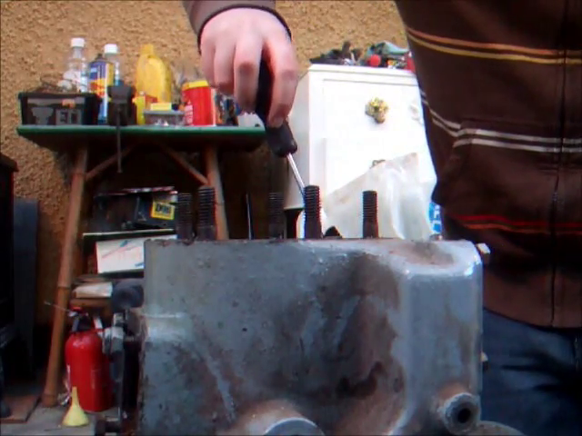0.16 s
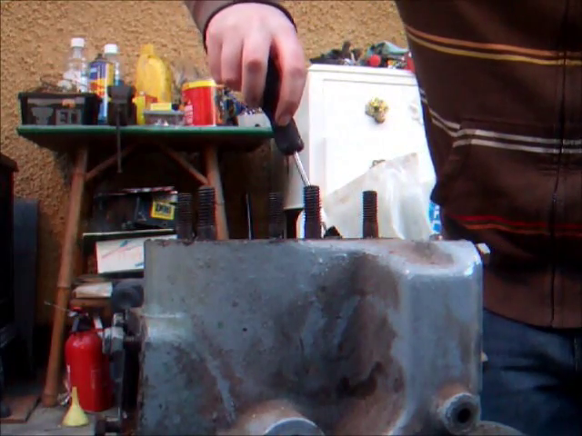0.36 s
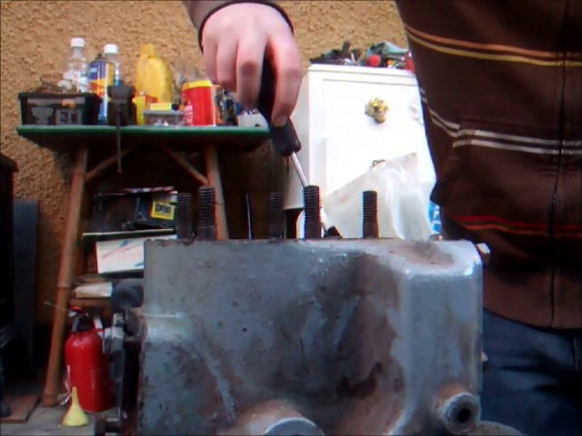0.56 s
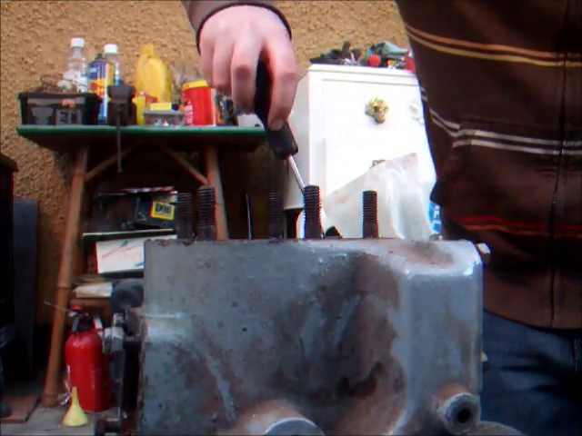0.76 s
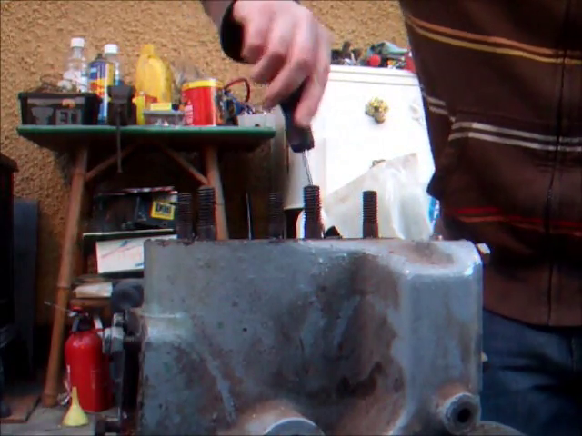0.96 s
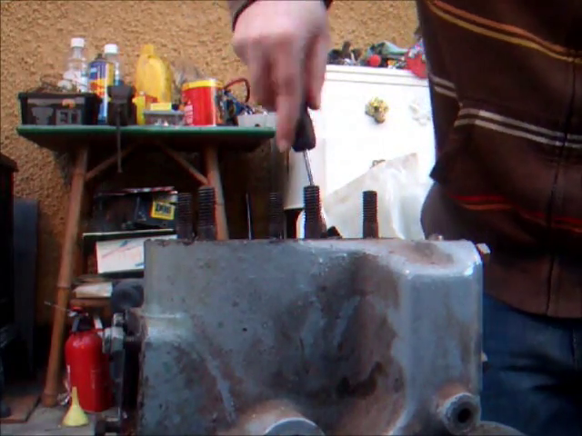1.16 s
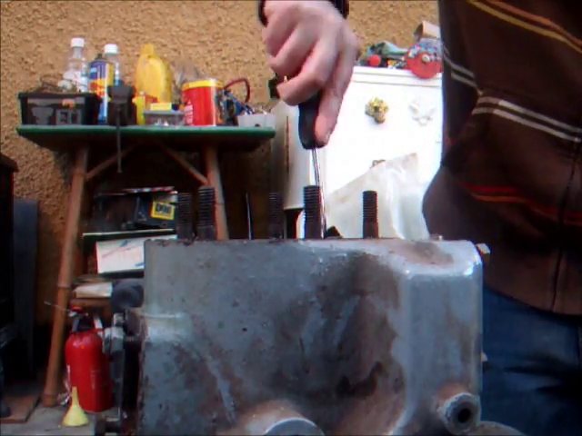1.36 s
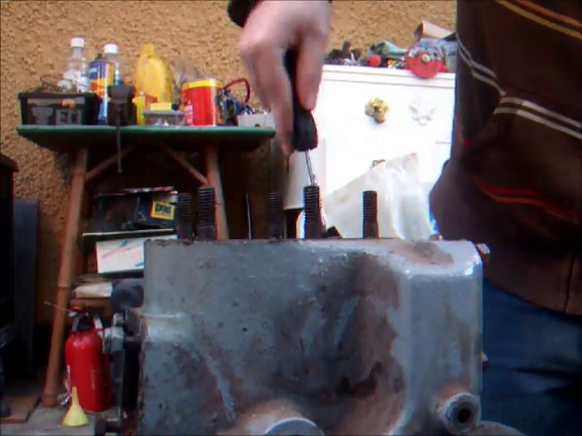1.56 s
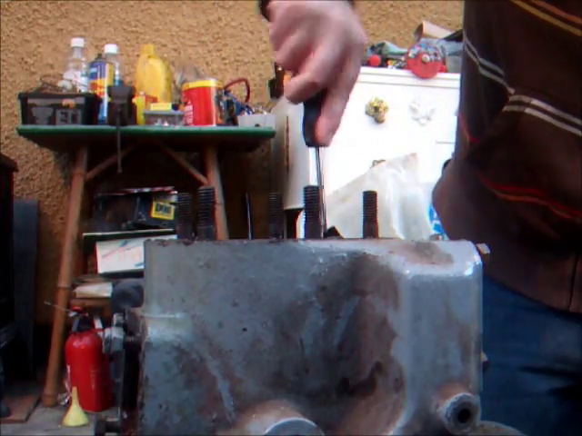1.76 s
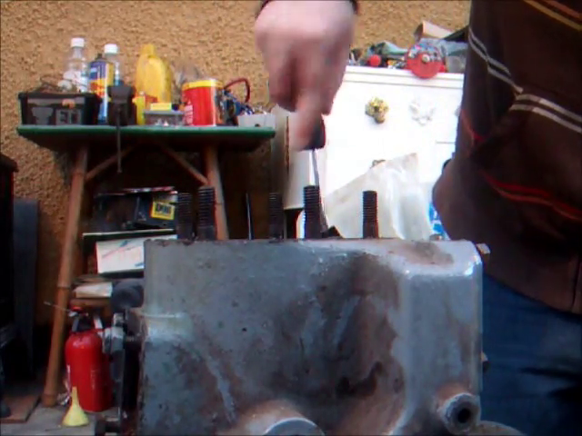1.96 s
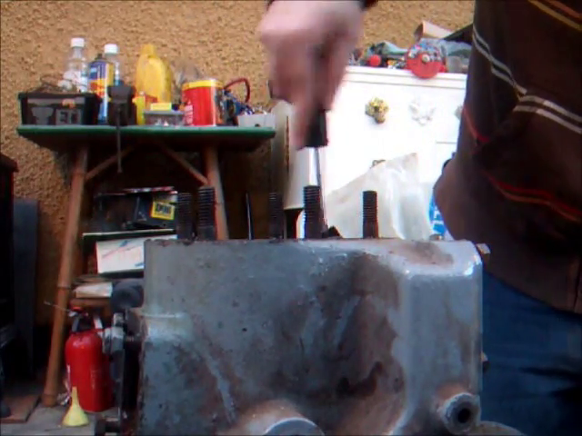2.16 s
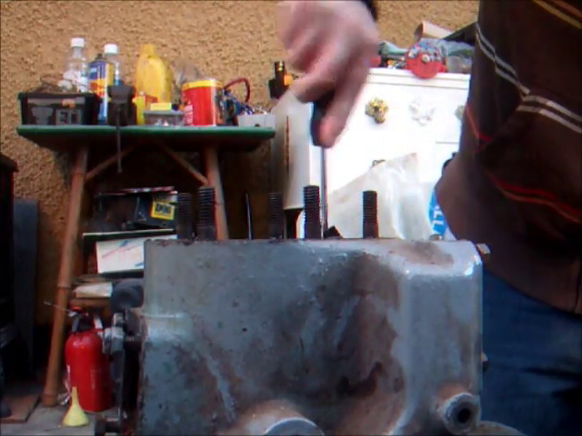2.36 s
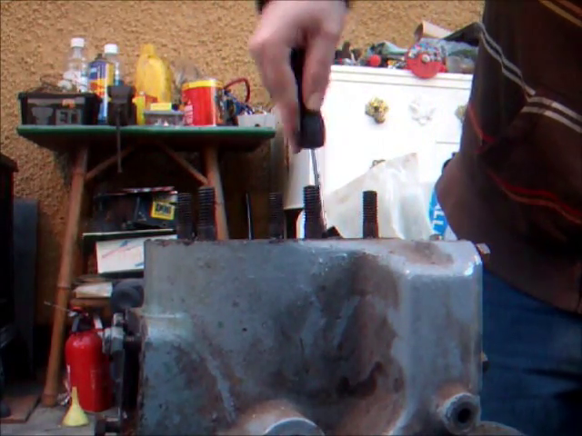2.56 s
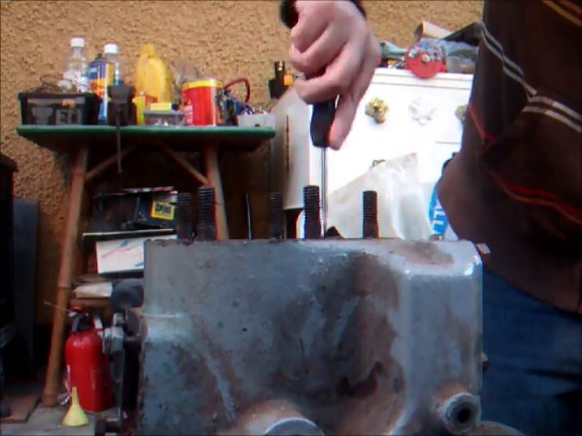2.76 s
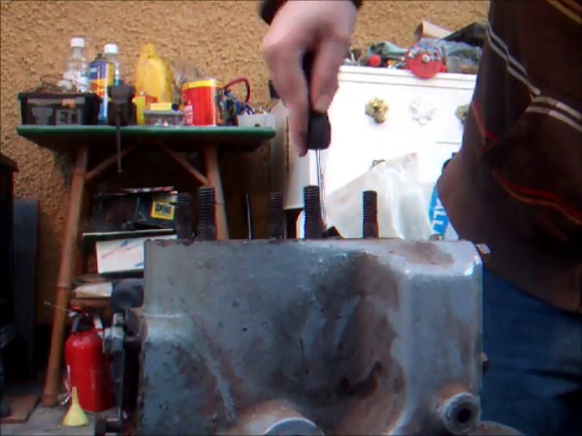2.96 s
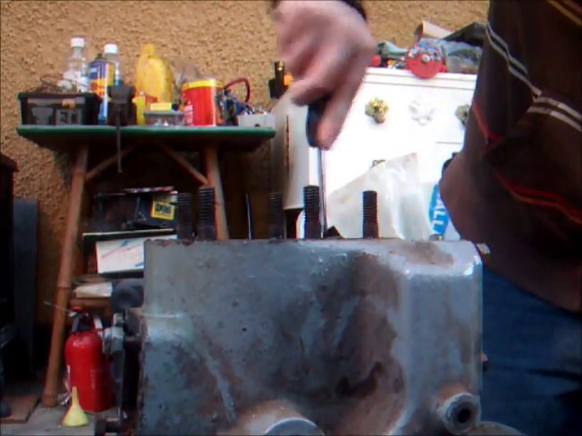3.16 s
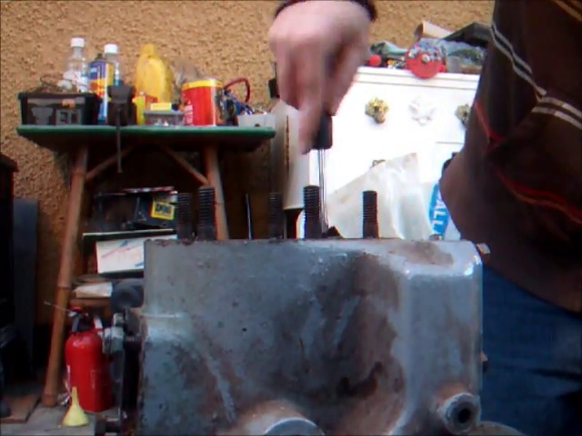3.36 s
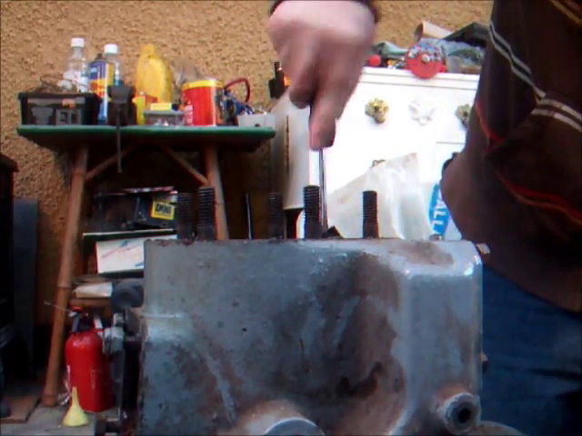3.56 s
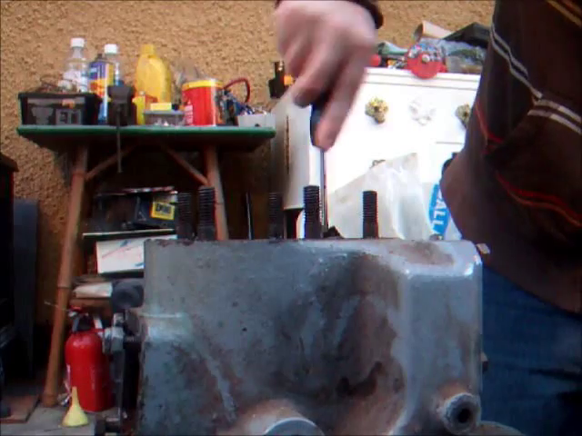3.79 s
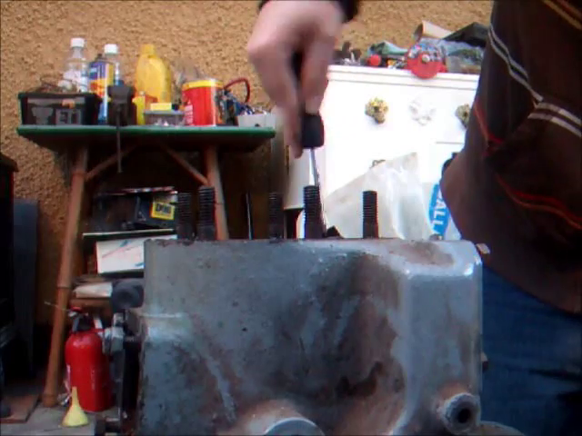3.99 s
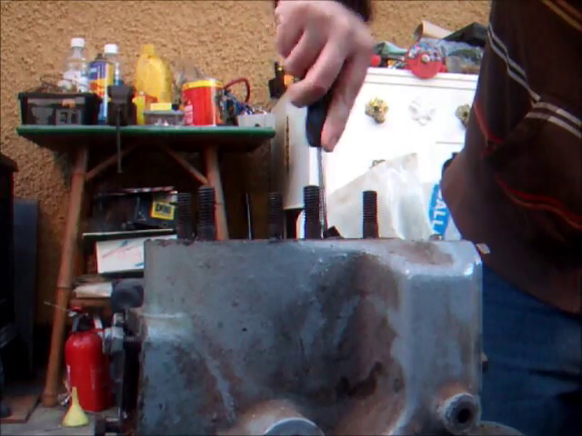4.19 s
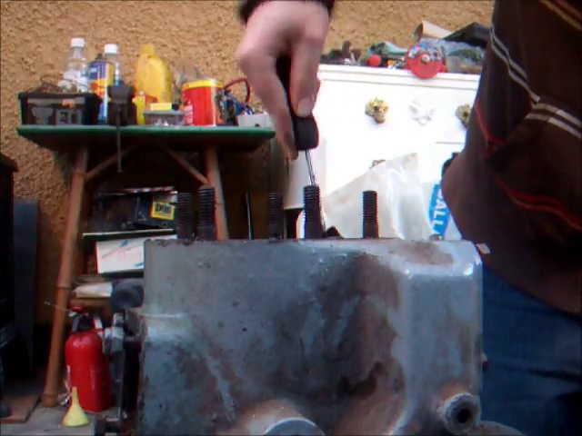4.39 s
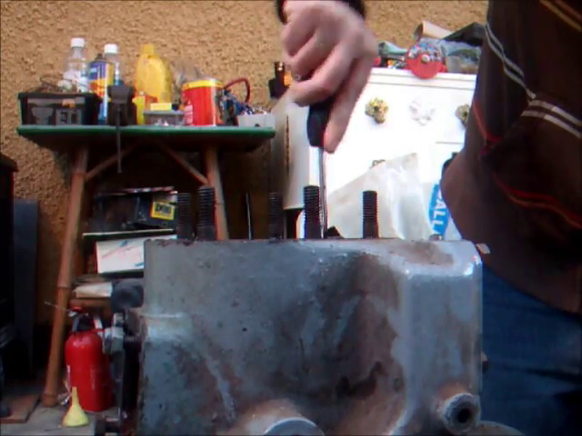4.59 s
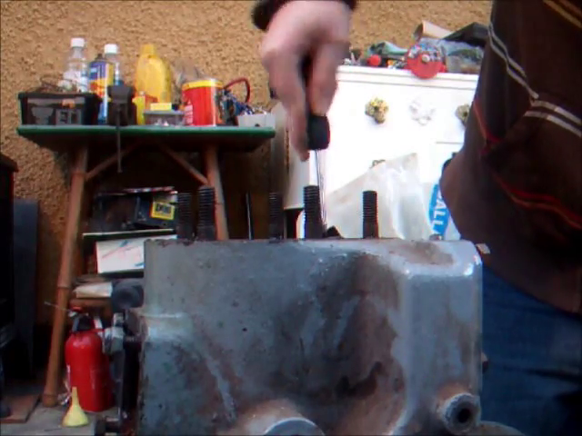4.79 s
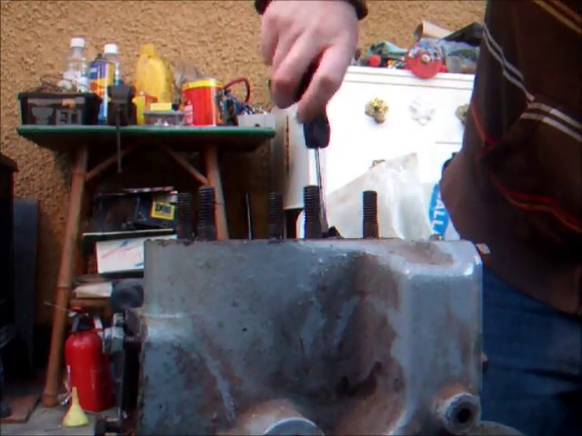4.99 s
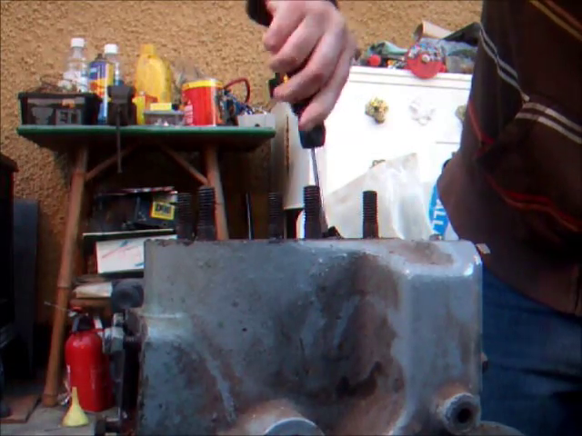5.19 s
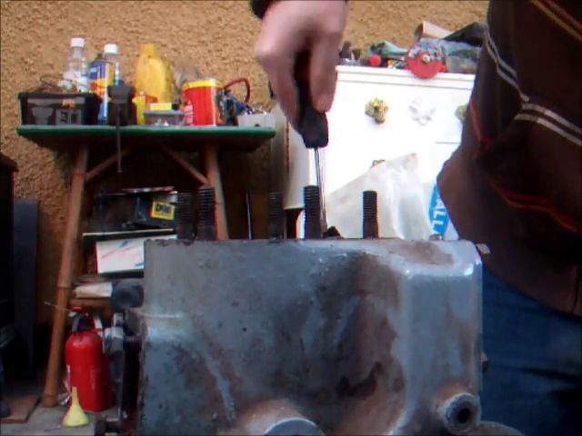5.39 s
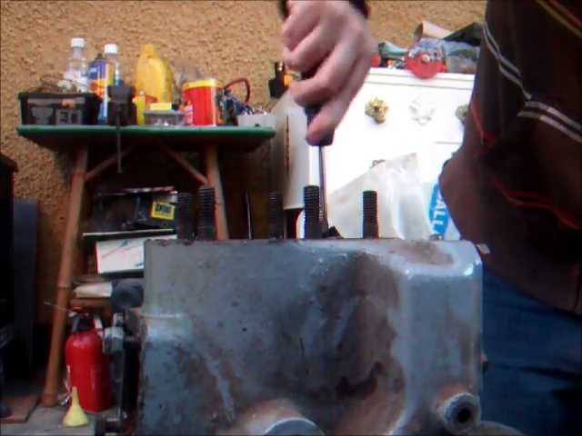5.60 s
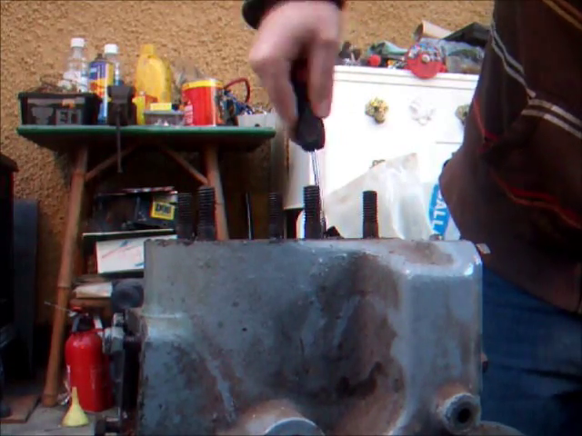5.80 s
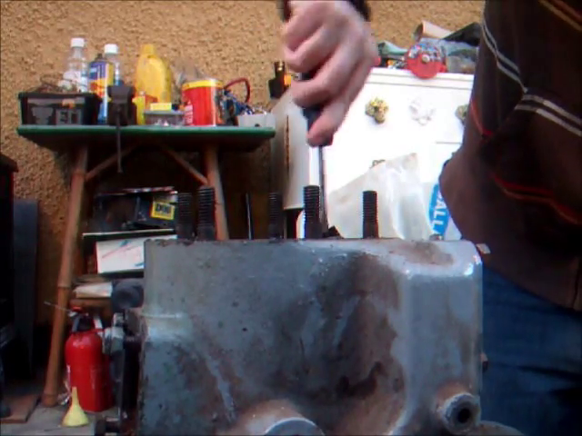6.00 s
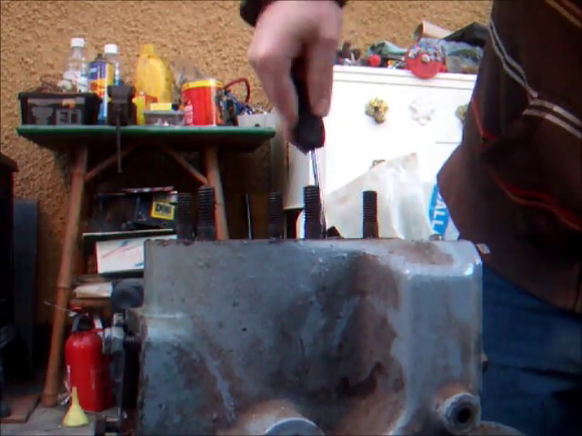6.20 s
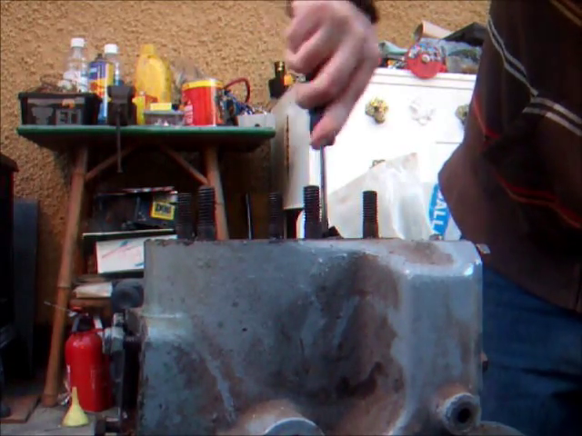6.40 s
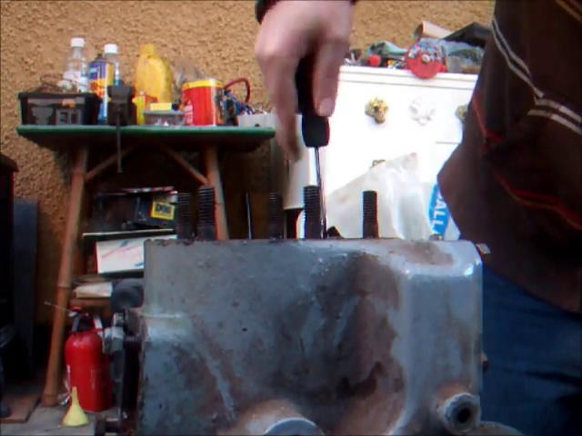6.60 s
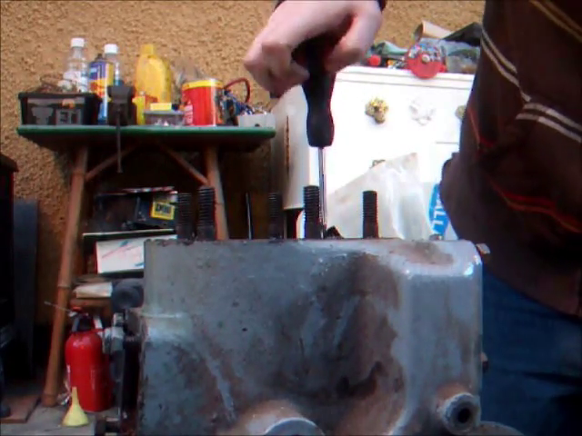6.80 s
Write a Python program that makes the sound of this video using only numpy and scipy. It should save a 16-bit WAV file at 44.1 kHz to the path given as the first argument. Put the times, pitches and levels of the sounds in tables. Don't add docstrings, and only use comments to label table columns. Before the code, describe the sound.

A screwdriver twists a steel valve to and fro on gritty paste, short rasping strokes with small ticks, over distant swelling traffic.

```python
import sys
import numpy as np
from scipy import signal
from scipy.fft import rfft, irfft, next_fast_len
from scipy.io import wavfile
from scipy.ndimage import uniform_filter1d, map_coordinates

SR = 44100
rng = np.random.default_rng(int(sys.argv[2]) if len(sys.argv) > 2 else 0)


def master(y):
    cut = np.clip(np.atleast_2d(y).T, -1, 1)
    pcm = np.round(cut * 32767)
    wavfile.write(sys.argv[1], SR, pcm.astype(np.int16))


def elevation(decibels):
    levels = np.asarray(decibels, float)
    return 10 ** (levels / 20)


N = 302085

# f/Hz, width/Hz, level/dB
CASTING_MODES = [(880, 140, -8.5), (1348, 240, -1), (1680, 52, 0), (2008, 330, -3.5), (2270, 260, -3.5),
                 (2595, 220, 1), (2040, 2300, -8)]
# f/Hz, width/Hz, level/dB
VALVE_MODES = [(2968, 240, 4.5), (3140, 190, 3.5), (3370, 190, 5.5), (3610, 250, 4.5), (3747, 96, 6),
               (3936, 260, 0.5), (4125, 170, 1), (3470, 2060, -1)]


def unit(x):
    return x / np.sqrt(np.mean(x ** 2) + 1e-20)


def along(points, hz):
    f, value = np.transpose(points)
    return np.interp(np.log(hz + 1), np.log(f + 1), value)


def wobble(rate):
    knots = rng.standard_normal(int(N * rate / SR) + 4)
    return map_coordinates(knots, [np.arange(N) * rate / SR])


def filtered(x, response):
    size = 2 * next_fast_len(len(x) // 2 + 4096)
    hz = np.fft.rfftfreq(size, 1 / SR)
    return irfft(rfft(x, size) * response(hz), size)[:len(x)]


def patchy(x, size, patchy_db, bins, frames):
    z = signal.stft(x, nperseg=size)[2]
    field = uniform_filter1d(rng.standard_normal(z.shape), size=bins, axis=0)
    field = uniform_filter1d(field, size=frames, axis=1)
    return signal.istft(z * elevation(patchy_db * unit(field)), nperseg=size)[1][:N]


def ringing(x, modes):
    size = 2 ** 14
    f, k = np.fft.rfftfreq(size, 1 / SR), np.arange(size)
    power = 0
    for centre, width, db in modes:
        damping = (f * width) ** 2
        power = power + elevation(2 * db) * (damping / ((centre ** 2 - f ** 2) ** 2 + damping)) ** 2
    cepstrum = irfft(np.log(power / power.mean() + 1e-9) / 2)
    causal = np.where(k < size // 2, 2, 0) / (1 + (k == 0))
    response = irfft(np.exp(rfft(cepstrum * causal)))
    return signal.oaconvolve(x, response[:size // 2])[:len(x)]


def rush(spectrum, patchy_db):
    noise = patchy(rng.standard_normal(N + 512), 512, patchy_db, bins=5, frames=12)
    return unit(filtered(noise, lambda hz: elevation(along(spectrum, hz))))


def engine_drone():
    # t/s, f/Hz, level/dB
    engine_path = [(0.0, 56.6, -47), (0.25, 54.5, -53), (0.78, 54.4, -54.5), (0.9, 62.4, -49),
                   (1.01, 61.3, -56), (3.38, 61.64, -49), (3.53, 55.4, -58), (3.64, 58.2, -51),
                   (3.93, 61.6, -52), (4.25, 61.1, -47.5), (5.32, 61.2, -49), (6.73, 57.54, -37.5),
                   (6.81, 55.7, -40), (6.85, 54, -40)]
    # multiple, level/dB
    orders = [(1.0, -0.5), (2.0, -11.5), (3.0, -17)]
    s, note_hz, note_db = np.transpose(engine_path)
    t = np.arange(N) / SR
    hz = np.interp(t, s, note_hz) * (1 + .007 * wobble(7))
    phase = 2 * np.pi * np.cumsum(hz) / SR
    drone = sum(elevation(db + 2.3 * wobble(3.8)) * np.sin(k * phase) for k, db in orders)
    return drone * elevation(np.interp(t, s, note_db) + 2.0)


def traffic():
    # t/s, level/dB
    nearness = [(0.0, -42), (1.64, -40), (2.12, -41.5), (3.87, -36), (4.69, -36.5), (5.36, -35),
                (5.84, -36.5), (6.28, -35), (6.85, -35)]
    # f/Hz, level/dB per Hz
    rumble_spectrum = [(12, -41), (20, 1.5), (27, -8), (60, 1.5), (147, -8.5), (179, -3.5), (238, -7.5),
                       (330, -17.5), (430, -42.5), (730, -120)]
    # f/Hz, level/dB per Hz
    tyre_spectrum = [(160, -38.5), (280, -10.5), (596, -5), (769, -3), (1270, -7), (1390, -5), (1800, -10),
                     (2270, -12.5), (3480, -17), (3910, -20.5), (4500, -23), (5850, -64.5), (9900, -120)]
    # [(f/Hz, width/Hz, level/dB)]
    hollows = [
        (1.5, [(352, 23, -12.5), (848, 93, -10.5), (997, 44, -6.5)]),
        (3.9, [(363, 34, -6), (627, 47, -1.5), (792, 35, 5.5), (997, 104, -2)]),
        (5.2, [(373, 42, -1.5), (625, 35, 2), (772, 34, -3.5), (875, 47, -2.5), (998, 75, -2)]),
        (6.5, [(367.3, 41, -1.5), (562, 86, -0.5), (800, 39, -11), (856, 39, -5), (994, 31, -8)]),
    ]
    t = np.arange(N) / SR
    near_db = np.interp(t, *np.transpose(nearness))
    rumble = elevation(near_db - 9.5) * rush(rumble_spectrum, patchy_db=1.0)
    peak_s = [when for when, modes in hollows]
    hollow = np.zeros(N)
    for one, (when, modes) in zip(np.eye(len(hollows)), hollows):
        fade = np.interp(t, peak_s, one)
        hollow += np.sqrt(fade) * ringing(rng.standard_normal(N), modes)
    roar = elevation(0.32) * rush(tyre_spectrum, patchy_db=0.73) + elevation(-6.5) * hollow
    return rumble + elevation(near_db + 1.5) * roar


def hiss():
    # f/Hz, level/dB per Hz
    hiss_spectrum = [(1500, -34), (3000, -7), (5500, -2), (8000, -8)]
    return elevation(-46.5) * rush(hiss_spectrum, patchy_db=0.5)


def tail(stretch):
    # f/Hz, t60/s
    yard_decay = [(1000, 0.67), (3500, .28), (8000, 0.35)]
    hz, t, z = signal.stft(rng.standard_normal(SR // 2), SR, nperseg=256)
    t60 = stretch * along(yard_decay, hz)[:, None]
    x = signal.istft(z * elevation(-60 * t / t60), SR, nperseg=256)[1]
    return x / np.linalg.norm(x)


def blow(ms, ring_db):
    t = np.arange(1024) * 1000 / SR
    shape = np.sqrt(t / ms) * np.exp(-t / ms)
    chatter = rng.standard_normal(len(t)) * shape
    for _ in range(2):
        z = rfft(chatter)
        chatter = irfft(z / (abs(z) + 1e-9)) * np.sqrt(shape)
    shiver = elevation(ring_db) * tail(stretch=0.71)[:SR // 2]
    contact = np.pad(chatter / np.linalg.norm(chatter), (0, len(shiver) - len(t)))
    return np.sqrt(ms) * (contact + shiver)


def knocks(blows, parts, lift_db):
    lead = SR // 20
    force = np.zeros((len(parts), N + lead + SR))
    for s, db, ms, ring_db, *rest_db in blows:
        gain = elevation(db + lift_db + np.array([0, *rest_db]))
        start = lead + round(s * SR)
        force[:, start:start + SR // 2] += gain[:, None] * blow(ms, ring_db)
    return sum(ringing(f, modes) for f, modes in zip(force, parts))[lead:lead + N]


def shank_strikes():
    # level/dB, contact/ms, after-ring/dB, upper modes/dB
    earlier_blow = (-9, 1.7, -2.5, 2.5)
    # t/s, level/dB, contact/ms, after-ring/dB, upper modes/dB
    shank_blows = [
        (0.3806, -5.5, 1.17, -6, -.6),
        (.3865, -16, 1.2, -4, 0),
        (0.664, -25, 1.3, -10, -11),
        (.68, -11, 1.5, -3.5, 2.5),
    ]
    shank_modes = [
        [(2220, 1000, -13.5), (2984, 89, 0), (3290, 310, 3), (3560, 210, -2.5), (3790, 180, -9.5), (3300, 2400, -15)],
        [(4590, 350, 0.5), (5160, 660, -5.5), (5720, 400, 1.5), (6100, 330, -3.5), (6670, 400, -16), (7320, 550, -13.5), (5800, 3400, -13)],
    ]
    return knocks([(-.012, *earlier_blow)] + shank_blows, shank_modes, lift_db=12.0)


def walls(x):
    step, out = SR // 2, np.zeros(N + 2 * SR)
    delay = 300
    for start in range(0, N, step):
        echo = signal.fftconvolve(x[start:start + step], tail(stretch=1.06))
        out[start + delay:][:len(echo)] += echo
    return out[:N]


def slot_ticks():
    # t/s, blade level/dB, casting level/dB, valve level/dB
    tick_blows = [(0.8435, -42, -7, -18), (0.9776, -30.5, -4, -4), (1.007, -24, -4.5, -3),
                  (1.4827, -25.5, 3, -7), (1.4968, -11, -7, -12), (1.8357, -22, 3, -3),
                  (1.9996, -24.5, 2.1, 5), (2.164, -29, 1, 3), (2.1875, -23, -9, -6), (2.3412, -32, 10, 4),
                  (2.88, -23, -1, -7), (3.2418, -23, -3, -7), (3.6015, -21.5, -9, -14),
                  (3.7807, -32, -3, 1), (4.15, -16, -19, -0.6), (4.4908, -26, -26, 5),
                  (4.508, -3.5, -39, -4.5), (4.6978, -15.5, -19, -23), (4.8926, -25, -10.5, -6),
                  (5.271, -26, -5, -10), (5.4997, -12.5, -22, -9), (5.694, -30, -5, -8),
                  (5.8979, -26, -8, -2.1), (6.0861, -32, -10, -19), (6.1045, -15, -18, -23)]
    # f/Hz, width/Hz, level/dB
    tip_modes = [(4700, 440, -5), (5300, 400, -1.5), (6030, 370, 3), (5700, 300, -4), (6900, 600, -12.5),
                 (5600, 2700, -12)]
    contact_ms, ring_db = 0.74, -9.5
    blows = [(s, db, contact_ms, ring_db, *rest_db) for s, db, *rest_db in tick_blows]
    return knocks(blows, (tip_modes, CASTING_MODES, VALVE_MODES), lift_db=11.5)


def grit(per_s, spread_db, smooth):
    coarse = np.minimum(rng.exponential(size=N), 3)
    grains = unit((rng.random(N) < per_s / SR) * elevation(spread_db * coarse))
    share = np.clip(smooth, 0, 1)
    return np.sqrt((1 - share) * grains ** 2 + share) * rng.standard_normal((3, N))


def lapping():
    # t/s, peak level/dB, rise/s, length/s
    twists = [(1.143, -25.5, 0.067, 0.12), (1.337, -28, 0.057, 0.11), (1.494, -21.5, 0.049, 0.093),
              (1.671, -26, 0.061, 0.11), (1.843, -20.5, 0.026, 0.079), (2.01, -25.5, 0.045, 0.12),
              (2.179, -20, 0.03, 0.081), (2.354, -25.5, 0.054, 0.12), (2.531, -21.5, 0.037, 0.083),
              (2.702, -26.5, 0.022, 0.13), (2.884, -21.5, 0.042, 0.079), (3.064, -27, 0.047, 0.12),
              (3.248, -22.5, 0.036, 0.073), (3.422, -28, 0.033, 0.12), (3.6, -25.5, 0.065, 0.097),
              (3.784, -29, 0.042, 0.13), (3.98, -26, 0.035, 0.092), (4.163, -27.5, 0.014, 0.11),
              (4.349, -27, 0.031, 0.095), (4.53, -30, 0.013, 0.1), (4.714, -30.5, 0.057, 0.097),
              (4.908, -32.5, 0.0089, 0.073), (5.314, -29.5, 0.061, 0.1), (5.51, -27.5, 0.035, 0.12),
              (5.714, -32, 0.044, 0.1), (5.905, -29.5, 0.025, 0.13), (6.1, -33, 0.073, 0.099),
              (6.308, -29.5, 0.011, 0.12), (6.499, -33.5, 0.044, 0.097)]
    # f/Hz, width/Hz, level/dB
    blade_modes = [(4610, 215, 0.5), (4960, 260, 1), (5000, 120, -2.5), (5350, 140, -2.5), (5636, 170, 4.5),
                   (6134, 410, 4), (6580, 200, -5.5), (6900, 540, -5), (7250, 380, -1), (7800, 410, -11.5),
                   (5870, 4000, -6.5)]
    # start level/dB, end level/dB, both against the peak
    swing = [
        (-8, -7.5),
        (-3.5, -11),
    ]
    # t/s, share worn (0-1)
    paste_wear = [(1.1, 0.01), (2.4, .1), (3.6, 0.25), (4.6, 0.36), (5.4, 0.66), (6.1, 0.85), (6.6, 0.76)]
    # fresh paste level/dB, worn paste level/dB
    casting_share = [
        (-3.5, -19),
        (-2, -15.5),
    ]
    # fresh paste level/dB, worn paste level/dB
    blade_share = [
        (-6, 4.5),
        (-4, -1.8),
    ]
    # fresh paste/dB, worn paste/dB
    blade_drift = [
        (-7.5, -4.5),
        (-3, 12.5),
    ]
    bite_s, bite_db, stop_s, stop_db = 0.0094, 9.5, 0.013, 15.5

    drive = np.zeros((3, N))
    for k, (s, db, rise, length) in enumerate(twists):
        way = k % 2
        start_db, end_db = swing[way]
        wear = np.interp(s, *np.transpose(paste_wear))
        colours = casting_share[way], blade_share[way], blade_drift[way]
        casting_db, blade_db, drift_db = [fresh + wear * (worn - fresh) for fresh, worn in colours]
        part = slice(round(s * SR), round((s + length + stop_s) * SR))
        u = np.arange(N)[part] / SR - s
        corners_s = [0, bite_s, max(rise, bite_s), length, length + stop_s]
        corners_db = [start_db - bite_db, start_db, 0, end_db, end_db - stop_db]
        speed_db = db + np.interp(u, corners_s, corners_db)
        blade_db = blade_db + drift_db * (u / length - .5)
        drive[:, part] += elevation([speed_db + casting_db, speed_db, speed_db + blade_db])
    judder_db = 0.23 * wobble(70) + 0.73 * wobble(220)
    judder_db = judder_db + 0.58 * np.array([wobble(40) for _ in drive])
    paste = drive * elevation(judder_db) * grit(per_s=5000, spread_db=2.5, smooth=0.62)
    parts = CASTING_MODES, VALVE_MODES, blade_modes
    scrape = sum(ringing(force, modes) for force, modes in zip(paste, parts))
    return elevation(-0.16) * patchy(scrape, 256, patchy_db=1.5, bins=3, frames=7)


def handle_bumps():
    # t/s, level/dB, contact/ms, after-ring/dB, upper modes/dB
    handle_blows = [
        (6.2722, -13, 1.15, -16, -1.5),
        (6.7252, -15, 1.9, -3, -0.5),
        (6.7305, -25, 2.4, -8, 4),
    ]
    handle_modes = [
        [(1420, 330, 2.5), (2480, 400, -5), (1500, 1500, -15)],
        [(3700, 480, 0), (4720, 520, -3), (6000, 420, -10), (7200, 500, -19), (4000, 2600, -11)],
    ]
    return knocks(handle_blows, handle_modes, lift_db=11.0)


def scene():
    road = engine_drone() + traffic() + hiss()
    knock = shank_strikes() + slot_ticks() + handle_bumps()
    rub = lapping()
    answer = walls(elevation(-9) * rub + elevation(-12.0) * knock)
    return (rub + knock + answer + road)[None]


def top_cut(x):
    return signal.sosfilt(signal.butter(12, 8540, fs=SR, output="sos"), x)


def record(dry):
    # f/Hz, level/dB
    mic_response = [(7300, 0.07), (7800, -4.5), (8000, -17), (8250, -25), (8330, -64), (9000, -80),
                    (12000, -100)]
    mix = filtered(dry[0], lambda hz: elevation(along(mic_response, hz))) - .0034
    return top_cut(mix[None])


dry = scene()
out = record(dry)
master(out)
```